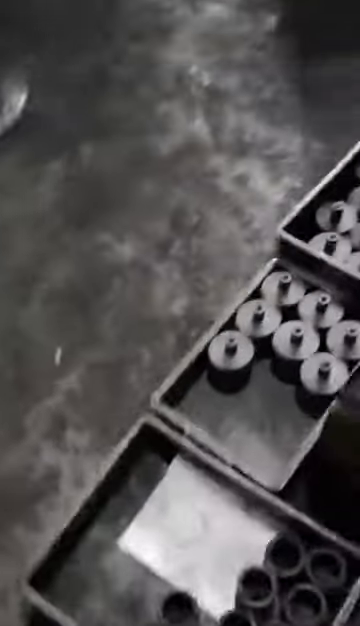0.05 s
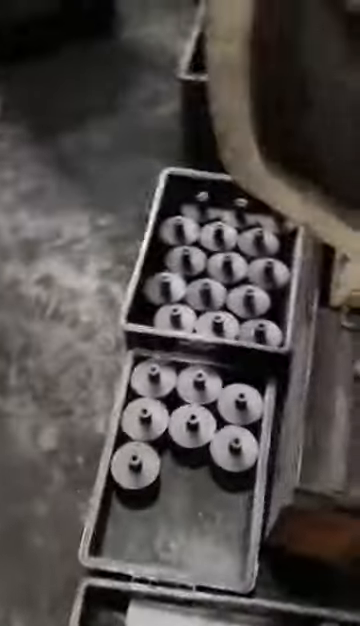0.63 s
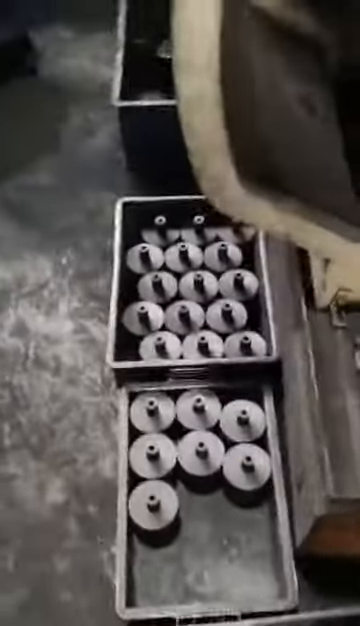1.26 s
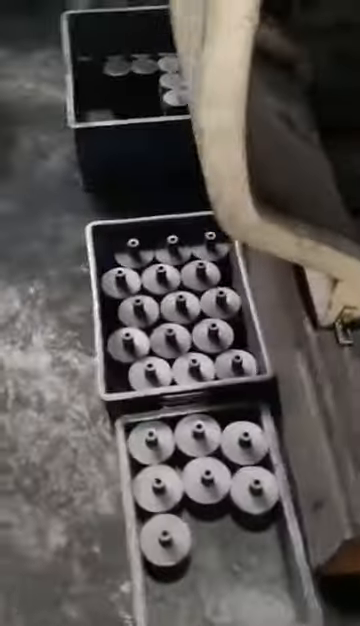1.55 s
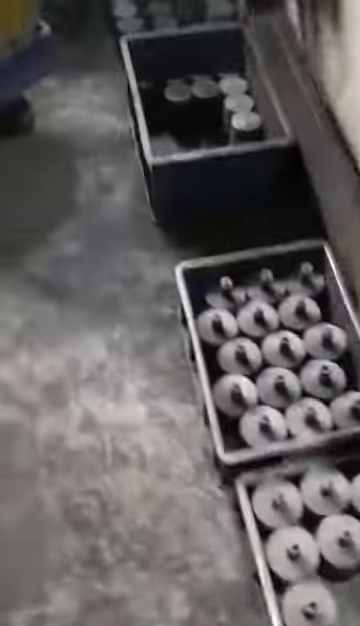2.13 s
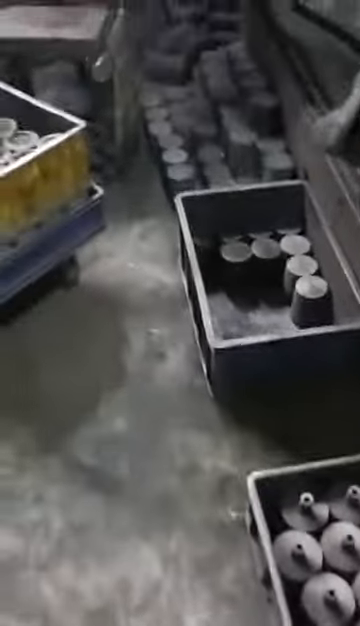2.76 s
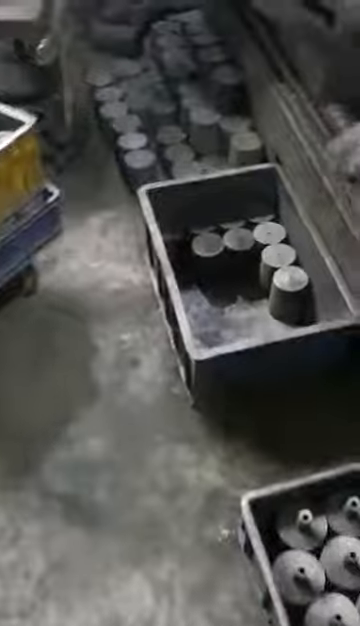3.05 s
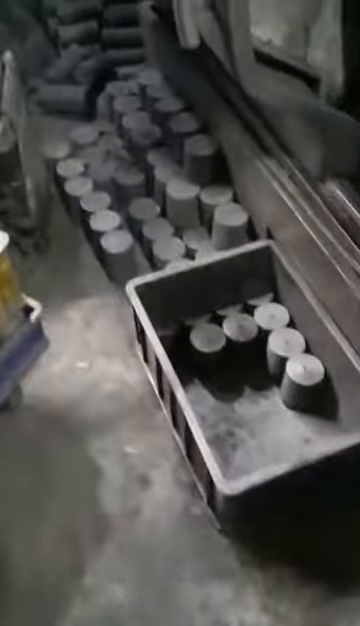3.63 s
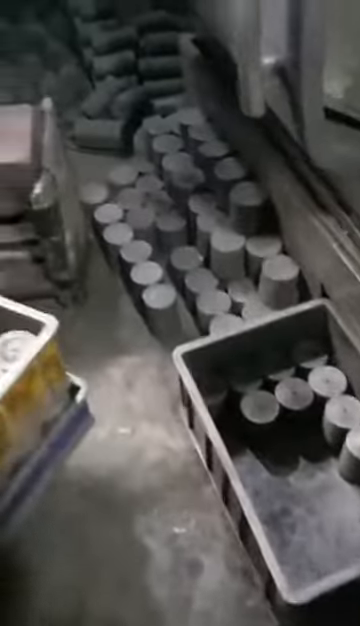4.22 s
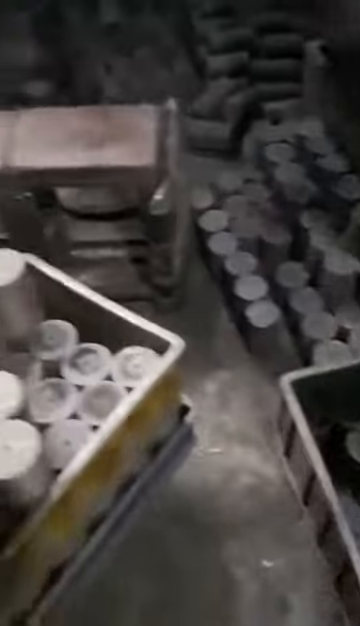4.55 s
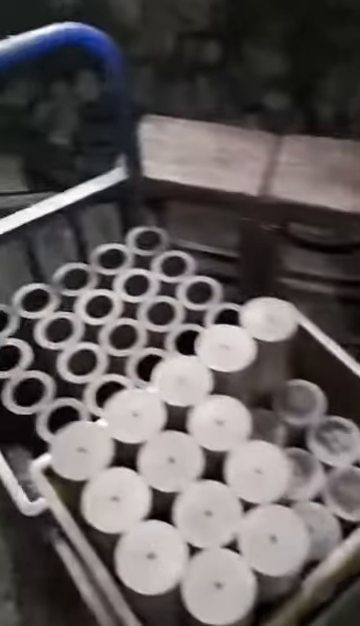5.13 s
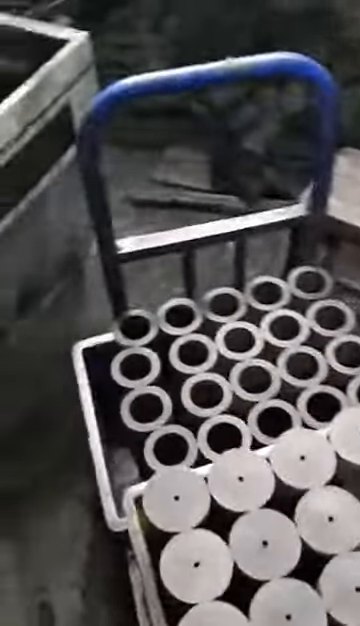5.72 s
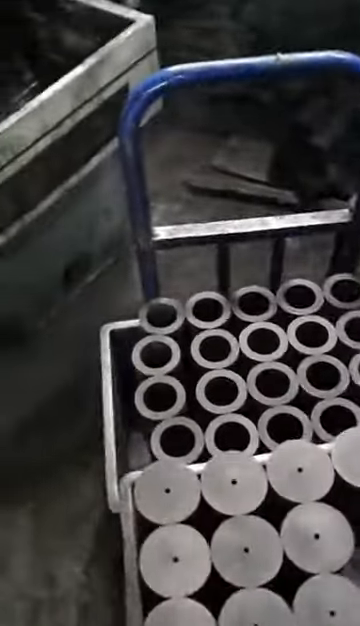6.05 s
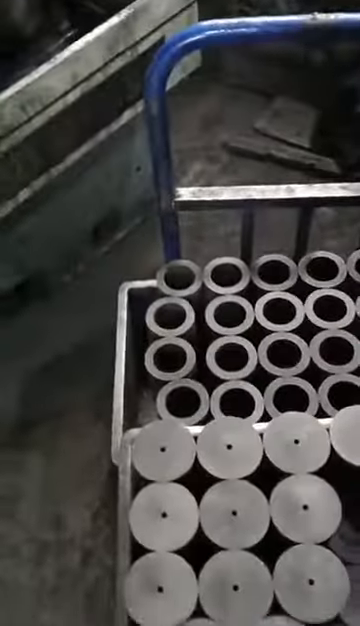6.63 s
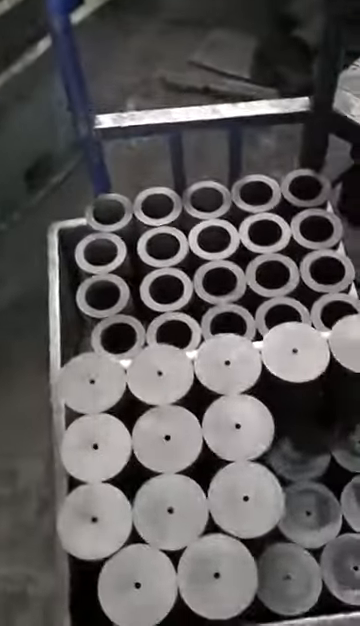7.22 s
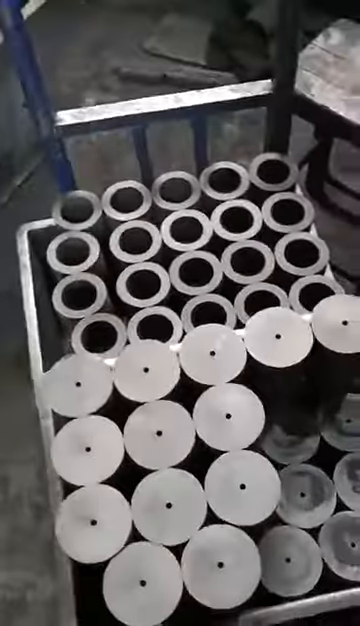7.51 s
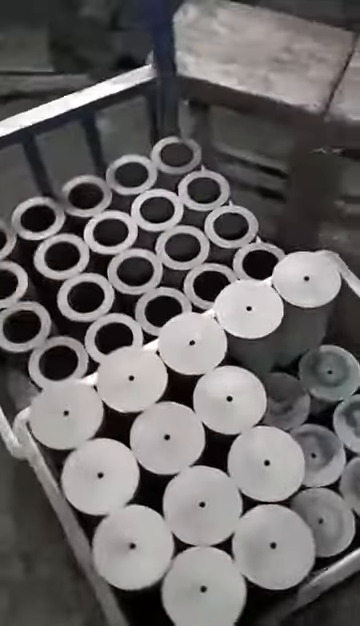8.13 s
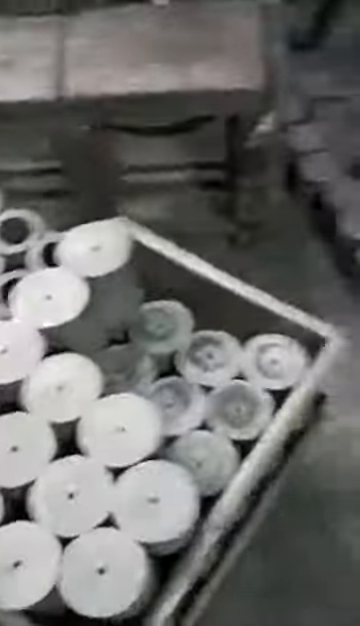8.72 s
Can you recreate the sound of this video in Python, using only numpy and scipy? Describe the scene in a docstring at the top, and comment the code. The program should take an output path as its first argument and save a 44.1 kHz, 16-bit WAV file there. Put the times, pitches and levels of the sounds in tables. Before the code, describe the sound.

Continuous metallic grinding and wavering gear whine fill a factory workshop, with occasional short squeals above a low machine drone.

```python
"""A hard-walled workshop, where machines run steadily and a microphone moves slowly past crates of parts.
Friction drives the narrow resonances of steel, which rasps, sings and now and then surges or squeals.
Gears whine and flare, motors hum and air hisses over the diffuse roar of machines farther off.
Reflections interfere, so the tones fade and return; hum and drone change with the microphone's place."""
import sys
import numpy as np
from scipy import signal
from scipy.fft import rfft, irfft, next_fast_len
from scipy.io import wavfile
from scipy.ndimage import uniform_filter1d, map_coordinates

SR = 44100
rng = np.random.default_rng(int(sys.argv[2]) if len(sys.argv) > 2 else 0)


def materialize(psi):
    """Save the field psi as 16-bit PCM at rate SR to the path in sys.argv[1].

    A 1-D psi becomes a single channel; in a 2-D psi each row is a channel.
    """
    bounded = np.clip(np.atleast_2d(psi).T, -1, 1)
    quanta = np.round(bounded * 32767).astype(np.int16)
    wavfile.write(sys.argv[1], SR, quanta)


N = 391166
T = np.arange(N) / SR
TREBLE_SHARE = .37  # share of the nearness level that hiss, rasp and overtones follow


def amp(db):
    """Amplitude ratio of a level in decibels."""
    return 10 ** (np.asarray(db) / 20)


def unit(x):
    """Normalisation to rms 1."""
    return x / np.sqrt(np.mean(np.abs(x) ** 2) + 1e-20)


def along(points, hz):
    """Interpolation of (frequency_hz, value) points on a logarithmic frequency axis."""
    frequencies, values = np.transpose(points)
    return np.interp(np.log(hz + 1), np.log(frequencies + 1), values)


def envelope(points):
    """Linear interpolation of (time_s, value) points at every sample."""
    return np.interp(T, *np.transpose(points))


def wobble(rate):
    """Smooth random modulation with `rate` knots a second."""
    coarse = T[::64]
    knots = rng.standard_normal(1024)
    return np.interp(T, coarse, map_coordinates(knots, [coarse * rate], mode="mirror"))


def swells(rows):
    """Sum in dB of raised-cosine swells, each given as (middle_s, length_s, rise_db)."""
    return sum(db * np.cos(np.pi * np.clip((T - middle) / length, -.5, .5)) ** 2
               for middle, length, db in rows)


def spread(pair, hz):
    """Spatial coherence: two signals become left and right, alike in the bass, unlike in the treble."""
    # likeness of the channels: frequency_hz, correlation
    coherence = [(60, .96), (180, .99), (280, .94), (380, .73), (550, .42), (800, .28), (1160, -.15),
                 (1550, -.2), (2300, .16), (3200, -.04), (6000, 0)]
    # balance of the channels: frequency_hz, left_minus_right_db
    balance = [(200, .1), (300, .3), (450, 1.8), (900, 1), (1400, 3), (1700, 3.6), (2000, 2), (2300, .3),
               (2800, 1.7), (3200, 1.5), (3700, -.8), (7000, -.8)]
    angle = np.arccos(np.clip(along(coherence, hz), -1, 1)) / 2
    mid, side = np.cos(angle) * pair[0], np.sin(angle) * pair[1]
    lean = amp(along(balance, hz) / 2)
    return np.array([(mid + side) * lean, (mid - side) / lean])


def patchy(pair, depth_db):
    """Random colouring: narrow ridges shift slowly in the treble, and broader patches flicker in level."""
    hz, _, spectra = signal.stft(pair, SR, nperseg=1024)
    ridges = uniform_filter1d(rng.standard_normal(spectra.shape), size=60, axis=2)
    patches = uniform_filter1d(rng.standard_normal(spectra.shape), size=5, axis=1)
    flicker = uniform_filter1d(patches, size=5, axis=2)
    treble = np.clip(hz / 1200, 0, 1)[:, None]
    field_db = depth_db * unit(.7 * unit(ridges) + unit(flicker)) * treble
    return signal.istft(spectra * amp(field_db), nperseg=1024)[1][:, :pair.shape[1]]


def diffuse_noise(colour, patchy_db):
    """A diffuse field: stereo noise of rms 1, shaped by the gain colour(hz)."""
    size = next_fast_len(N)
    hz = np.fft.rfftfreq(size, 1 / SR)
    pair = rng.standard_normal((2, size))
    if patchy_db:
        pair = patchy(pair, patchy_db)
    return unit(irfft(spread(rfft(pair) * colour(hz), hz), size)[:, :N])


def rush(spectrum, patchy_db=0):
    """Broadband noise with a spectral envelope of (frequency_hz, level_db) points."""
    return diffuse_noise(lambda hz: amp(along(spectrum, hz)), patchy_db)


def ringing(modes, patchy_db=0):
    """Resonance under random excitation: the powers of the modes add."""
    def colour(hz):
        powers = (amp(db) ** 2 / (1 + ((hz - pitch) / width) ** 2) ** 2 for pitch, width, db in modes)
        return np.sqrt(sum(powers))
    return diffuse_noise(colour, patchy_db)


def tone(hz, drift_hz, scatter, fade_rate):
    """Multipath interference: a tone's reflections add and cancel as the microphone moves."""
    phase = 2 * np.pi * np.cumsum(hz + drift_hz * wobble(3)) / SR
    paths = []
    for lag in 2 * np.pi * rng.random(2):
        in_phase = np.cos(lag) + scatter * wobble(fade_rate)
        quadrature = np.sin(lag) + scatter * wobble(fade_rate)
        paths.append(unit(in_phase * np.cos(phase) + quadrature * np.sin(phase)))
    return spread(paths, hz)


def chirps(rows, slide_hz_per_s=19):
    """Linear chirps: brief tones swell, slide up or down and fade, each from its own direction."""
    out = np.zeros((2, N))
    for (middle, length, db, hz), (offset, slide, side) in zip(rows, rng.standard_normal((len(rows), 3))):
        span = slice(*np.searchsorted(T, [middle - length / 2, middle + length / 2]))
        t = T[span] - middle
        phase = 2 * np.pi * (offset + (hz + slide * slide_hz_per_s * t / 2) * t)
        pair = np.sqrt(2) * np.array([np.cos(phase), np.sign(side) * np.sin(phase + side / 2)])
        out[:, span] += amp(db) * np.cos(np.pi * t / length) ** 2 * spread(pair, hz)
    return out


def distant_machines(near_db):
    """Incoherent summation: far machines blend into rumble, drone, whir and a rush like running belts."""
    # spectra of the four noises: frequency_hz, relative_db
    rumble_spectrum = [(20, -28), (45, -18), (62, -11), (80, -5), (105, -3), (125, -3), (148, 4),
                       (175, -8.5), (215, -3), (260, -10.5), (600, -53)]
    drone_spectrum = [(100, -44.5), (165, -2.5), (205, -3), (245, -7), (310, 3), (420, 3), (520, -1.5),
                      (750, -31), (1500, -66)]
    whir_spectrum = [(250, -36.5), (450, -10), (520, -4), (750, -2), (900, -2.5), (1400, -11), (2500, -10),
                     (3600, -34.5), (6000, -52.5)]
    belt_spectrum = [(750, -35.5), (950, 1), (1030, -0.5), (1180, 2.5), (1250, -3), (1350, 3), (1500, -3.5),
                     (1780, -6), (2200, -4.5), (2900, -9), (3400, -11), (6000, -50.5)]
    # swells of the rumble, shared in part by drone and whir: middle_s, length_s, rise_db
    heaves = [(4.33, 0.87, 11), (8.28, .7, 3.5)]
    # the drone from place to place: time_s, level_db
    drone_levels = [(0, -37), (.45, -38), (.85, -35.5), (1.5, -39), (2.3, -40), (2.9, -40.5), (3.6, -37.5),
                    (4.4, -36), (5.35, -40.5), (5.8, -38.5), (6.4, -39.5), (7.3, -35.5), (8.1, -39.5),
                    (8.7, -37.5)]
    heave_db = swells(heaves)
    rumble = amp(-50.5 + heave_db + 2.3 * wobble(14)) * rush(rumble_spectrum)
    drone = amp(envelope(drone_levels) + .28 * heave_db) * rush(drone_spectrum)
    whir = amp(-31 + near_db + .25 * heave_db) * rush(whir_spectrum, patchy_db=3)
    belts = rush(belt_spectrum, patchy_db=3.8) * amp(-30 + .2 * near_db + .32 * wobble(20))
    return rumble + drone + whir + belts


def air(near_db):
    """Flow noise: a fine hiss flutters, and a leak's faint whistle sputters and wavers in pitch."""
    # spectrum of the hiss: frequency_hz, relative_db
    hiss_spectrum = [(1800, -30), (3100, -4.5), (3600, -3), (4050, -3.5), (4300, -2.5), (4520, -2.3),
                     (4680, -6), (5100, -6), (5700, -5), (6050, -2), (6330, 1.5), (6450, -10), (6750, -10),
                     (6900, -4.5), (7500, -6)]
    # whistling bands of the leak: pitch_hz, half_width_hz, relative_db
    nozzle_modes = [(3860, 90, -4), (4815, 48, 5.3), (5895, 70, 4.2), (6290, 105, 1)]
    # how openly the leak faces the microphone: time_s, relative_db
    leak_facing = [(0, -53), (3.3, -55), (3.55, -46.5), (3.8, -48), (4.05, -44), (5.5, -43), (6.4, -41),
                   (7.5, -42.5), (8.87, -42.5)]
    waver_s, sputter_rate = .00022, 15
    hiss, leak = rush(hiss_spectrum, patchy_db=3), ringing(nozzle_modes, patchy_db=3)
    warped_time = T + waver_s * wobble(sputter_rate)  # a varying delay bends the pitch
    leak = unit(np.array([np.interp(warped_time, T, side) for side in leak]))
    leak_db = envelope(leak_facing) + 3.3 + 1.5 * wobble(sputter_rate)
    hiss_db = -32.5 + TREBLE_SHARE * near_db + .76 * wobble(22)
    return amp(hiss_db) * hiss + amp(leak_db) * leak


def motors():
    """Standing waves: a motor's hum varies by place over mains hum, whose band near 200 Hz swells and fades."""
    # the motor's standing wave along the microphone's path: time_s, level_db
    hum_levels = [(0, -68), (.8, -49), (2.4, -69), (3, -45), (4.3, -41.5), (5.1, -45.5), (6, -46.5),
                  (6.8, -49.5), (7.85, -48), (8.87, -48)]
    # band of mains hum near 200 Hz, louder from 1 to 3 s: time_s, level_db
    buzz_levels = [(0, -65), (1.1, -47.5), (1.8, -51), (2.6, -46.5), (3.4, -47), (4.25, -55.5), (4.9, -60),
                   (8.87, -59)]
    # shape of that mains band: pitch_hz, half_width_hz, relative_db
    buzz_band = [(207, 26, 0)]
    # mains harmonics: pitch_hz, relative_db
    harmonics = [(50, -65.5), (100, -68), (200, -55)]
    hum_db = envelope(hum_levels) + 1.1 * wobble(8.9)
    hum = amp(hum_db) * tone(158.8, drift_hz=.6, scatter=.27, fade_rate=18)
    buzz = amp(envelope(buzz_levels)) * ringing(buzz_band, patchy_db=-1.5)
    mains = sum(amp(db - 2.5) * tone(hz, drift_hz=.1, scatter=.45, fade_rate=3.3) for hz, db in harmonics)
    return hum + buzz + mains


def fan():
    """Flow-excited resonance: a fan's housing rings around its tones, all louder when near."""
    # tones of the fan: pitch_hz, relative_db
    partials = [(285, -52.5), (300, -51), (408, -54), (424, -51), (439, -47.5), (452, -50.5), (461, -48.5),
                (799, -50)]
    # resonance of the housing: pitch_hz, half_width_hz, relative_db
    housing_modes = [(427, 81, 0)]
    # nearness of the fan: time_s, gain_db
    nearness = [(0, -4), (2.7, 0.5), (3.5, -1), (5.3, 0), (6.2, 2), (7.55, 4), (8.05, -1), (8.7, 7)]
    tones = sum(amp(db) * tone(hz, drift_hz=.52, scatter=.76, fade_rate=2.5) for hz, db in partials)
    housing = amp(-47) * ringing(housing_modes)
    return amp(envelope(nearness)) * (tones + housing)


def flare_db(hz):
    """Amplitude modulation: the whine at this pitch flares up and sinks back."""
    # flares of single whines: middle_s, length_s, rise_db, pitch_hz
    flares = [(.02, .4, 8, 1875), (.38, .35, 13, 731), (0.757, 1.7, 8.5, 1137), (0.736, .3, 12.5, 2010),
              (.8, .57, 6.5, 1875), (1.22, .45, 9.5, 731), (1.68, .6, 10, 731), (2.053, .35, 5, 2010),
              (2.12, .35, 5, 1875), (2.457, .35, 9, 1875), (2.48, .3, 4, 731), (2.746, .33, 6, 1137),
              (2.751, .4, 13, 731), (3.285, .44, 7.5, 1645), (3.35, .45, 14.5, 731), (3.62, .3, 12.5, 731),
              (3.796, .6, 5.5, 1875), (4.776, .35, 8, 1875), (4.9, .4, 9, 731), (5.065, .35, 11, 1875),
              (5.433, 1, 11, 2010), (6.064, .37, 8, 1645), (6.895, 4.9, 7, 960), (6.8, 4.1, 4, 1096),
              (7, 1.3, 7.5, 1875), (7.11, 1.2, 9, 1848), (7.298, .4, 8, 731), (7.5, 1, 2, 2010),
              (7.6, .6, 3, 1875), (7.703, 3.6, 4, 853), (8.42, .4, 10, 731), (8.6, .62, 8.5, 2010),
              (8.647, .39, 13, 1848)]
    return swells([swell for *swell, pitch in flares if abs(pitch - hz) < 12])


def leading_whine(hz):
    """A tone in narrowband noise: the whine and its rough, ringing fringe flare together."""
    clean = tone(hz, drift_hz=1.4, scatter=.34, fade_rate=14)
    fringe = amp(-10.5) * ringing([(hz, 35, 0)])
    return amp(-37.8 + flare_db(hz)) * (clean + fringe)


def gears():
    """Frequency modulation: whines waver with the load, the higher ones more; two stand out."""
    # gear and shaft whines between flares: pitch_hz, level_db
    whines = [(493, -54), (515, -53), (662, -53), (731, -49), (853, -46), (960, -46), (994, -47),
              (1096, -42), (1137, -43), (1279, -48), (1562, -44), (1645, -40.5), (1708, -45), (1848, -44),
              (1990, -42), (2654, -42.5), (2703, -44), (2845, -41), (2922, -42)]
    faint = 0
    for hz, db in whines:
        whine = tone(hz, drift_hz=.0009 * hz, scatter=.25 + hz / 10000, fade_rate=5 + .004 * hz)
        faint += amp(db + flare_db(hz)) * whine
    return faint + leading_whine(hz=1875) + leading_whine(hz=2010)


def rasp(near_db):
    """Friction noise: the grinding contact scrapes and chatters through broad, damped resonances."""
    # resonances of the contact: pitch_hz, half_width_hz, relative_db
    contact_modes = [(3260, 90, -1), (3380, 40, -2.5), (3555, 50, 1), (3830, 42, 2.5), (3940, 45, -1.5),
                     (4085, 40, -.5)]
    chatter_db = wobble(rate=90)
    return amp(-38.7 + TREBLE_SHARE * near_db + chatter_db) * ringing(contact_modes, patchy_db=4)


def overtones(near_db, per_second=260):
    """Modal excitation: grinding wakes high modes of the steel at random; each sings for a moment."""
    # spectral envelope of the overtones: frequency_hz, relative_db
    colour = [(2280, -2), (2450, 0), (2650, 3), (2850, 4.5), (3000, 2.5), (3070, -5), (3150, -1.5),
              (3300, -2.5), (3450, -4), (3550, -1), (3700, -5), (3850, -.5), (3970, -3), (4080, -2),
              (4150, -6)]
    count = int(per_second * N / SR)
    when, pitch, life = rng.random((count, 3)).T
    middle_s, length_s = when * N / SR, .058 * (.5 + life)
    hz = np.interp(pitch, [0, 1], [2280, 4150])
    peak_db = -40.4 + along(colour, hz) + 1.6 * rng.standard_normal(count)
    return amp(TREBLE_SHARE * near_db) * chirps(np.transpose([middle_s, length_s, peak_db, hz]))


def squeals():
    """Stick-slip oscillation: the steel catches and one resonance squeals briefly."""
    # catches of the steel: middle_s, length_s, peak_db, pitch_hz
    catches = [(1.8, 0.23, -39, 1705), (2.12, .35, -32.5, 2092), (2.42, 0.23, -31, 2700),
               (3.42, 0.17, -27.5, 2700), (4.26, .42, -28.5, 1976), (4.27, 0.7, -28.5, 2828),
               (4.73, 0.18, -41, 2910), (5, .22, -32, 2700), (5.62, 0.54, -27, 2845),
               (5.78, .25, -34, 1708), (6.15, 0.9, -53, 2926), (6.6, 0.27, -34, 2925),
               (7.1, 0.3, -38, 1558), (8.1, 0.26, -28.5, 2652), (8.17, 0.68, -30, 2848)]
    return chirps(catches)


def steel():
    """Friction-driven resonance: uneven contact makes steel swell and chatter; surges brighten it."""
    # lower and upper resonances of the steel: pitch_hz, half_width_hz, relative_db
    low_modes = [(1515, 18, -9), (1556, 14, -5.5), (1605, 22, -2.5), (1660, 45, -7.5), (1702, 16, -2),
                 (1835, 30, -8), (1872, 20, -2), (1915, 60, -5.5), (1984, 14, -2), (2035, 45, -4.5),
                 (2101, 13, -2), (2310, 35, -9), (2370, 20, -11)]
    high_modes = [(2420, 16, -6), (2468, 14, -6.5), (2515, 20, -9), (2560, 13, -4), (2615, 30, -4),
                  (2654, 15, -1), (2700, 18, -1.5), (2752, 22, -2), (2797, 20, -2), (2842, 13, 2),
                  (2882, 25, 0), (2922, 15, 2.5), (2982, 22, -2.5), (3018, 12, -4), (3125, 14, -9),
                  (3158, 14, -11)]
    # moments of harder rubbing: middle_s, length_s, rise_db
    surges = [(1.45, 0.65, 2.8), (2.22, 0.27, 3.5), (4.25, 0.37, 0.5), (4.8, 0.53, 3), (5.62, 0.77, 1),
              (6.3, 2.2, 1.2), (8.13, 0.58, 3)]
    surge_db = swells(surges)
    low, high = ringing(low_modes, patchy_db=1.7), ringing(high_modes, patchy_db=1.5)
    low_db = -27 - .24 * surge_db + .37 * wobble(1.9)  # the lower modes give way in a surge
    high_db = -27.5 + surge_db + 1.1 * wobble(70)
    return amp(low_db) * low + amp(high_db) * high


def scene():
    """Superposition: the sound pressures of all the machines add at the microphone."""
    # nearness of the whirring machines: time_s, gain_db
    nearness = [(0, 2.5), (1.4, 2.5), (3.2, -0.5), (5.7, -2), (6.5, -0.5), (8.1, -2), (8.87, -2.5)]
    near_db = envelope(nearness)
    background = distant_machines(near_db)
    grinding = steel() + rasp(near_db) + squeals() + overtones(near_db)
    return background + grinding + gears() + motors() + fan() + air(near_db)


def record(dry):
    """Band limiting: an ideal low-pass filter passes nothing above its cutoff."""
    cutoff_hz = 7540
    size = next_fast_len(N + SR // 4)
    passband = np.fft.rfftfreq(size, 1 / SR) < cutoff_hz
    return irfft(rfft(dry, size) * passband, size)[..., :N]


dry = scene()
out = record(dry)
materialize(out)
```